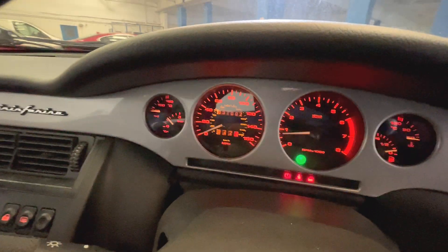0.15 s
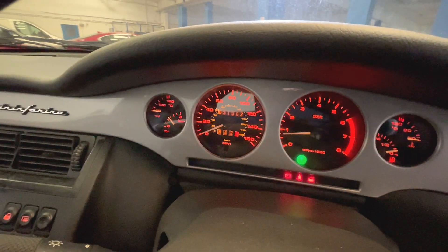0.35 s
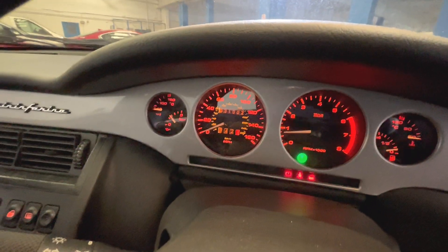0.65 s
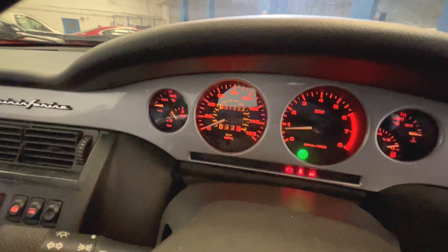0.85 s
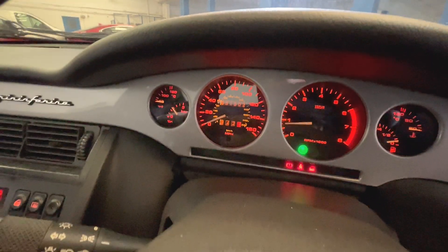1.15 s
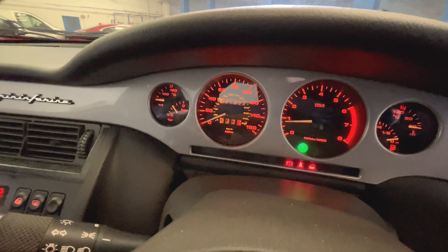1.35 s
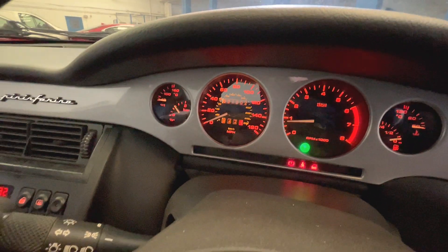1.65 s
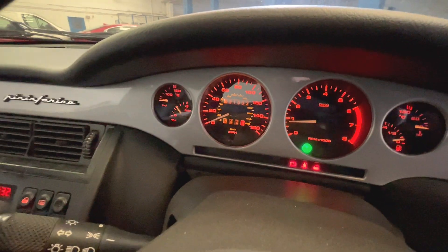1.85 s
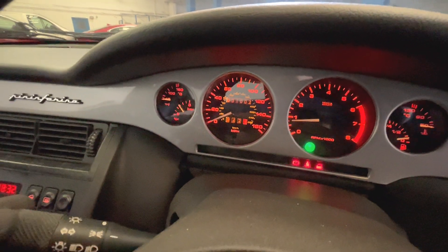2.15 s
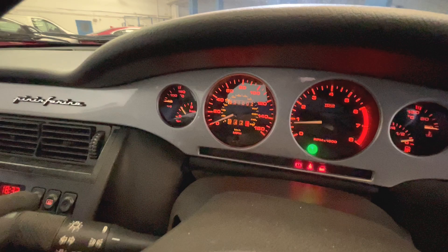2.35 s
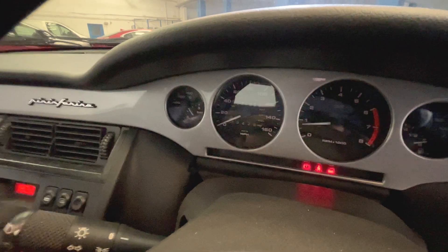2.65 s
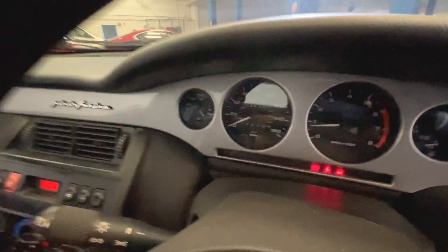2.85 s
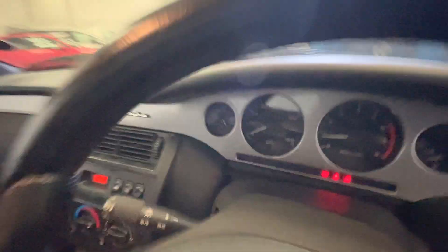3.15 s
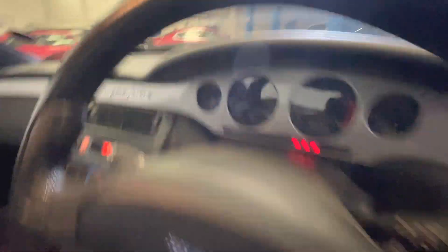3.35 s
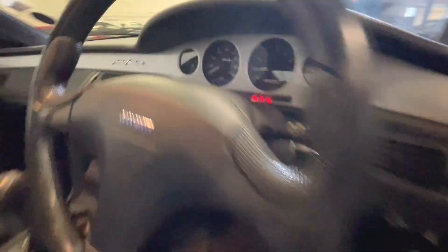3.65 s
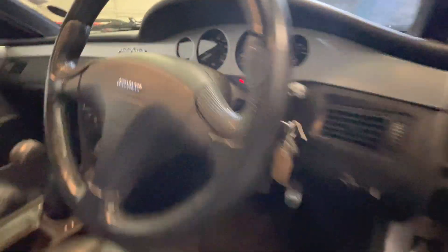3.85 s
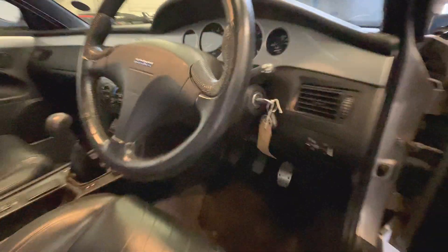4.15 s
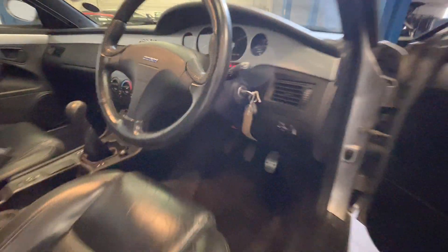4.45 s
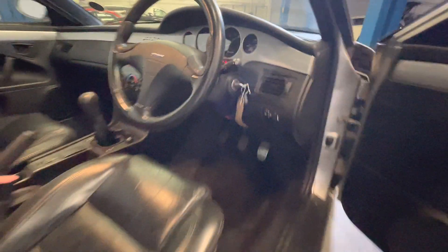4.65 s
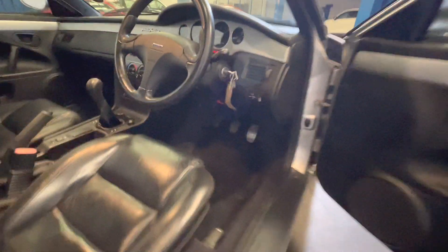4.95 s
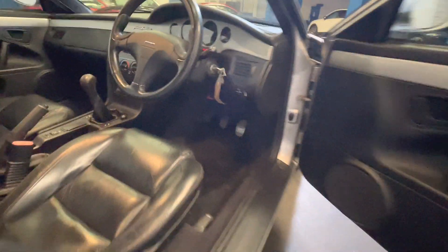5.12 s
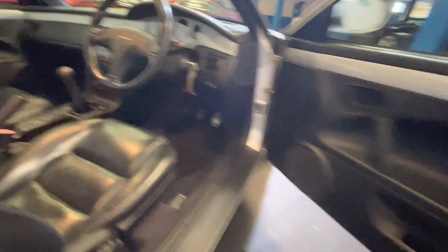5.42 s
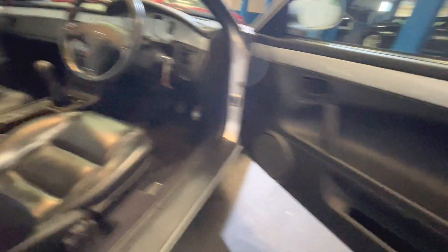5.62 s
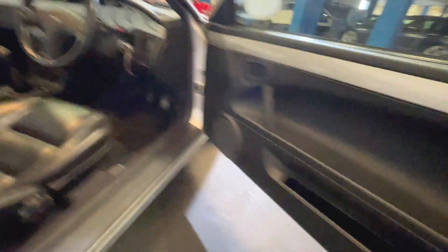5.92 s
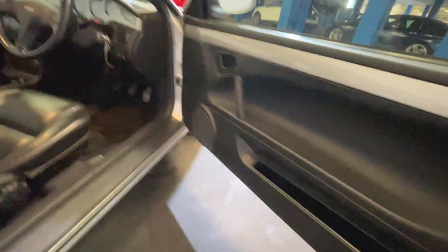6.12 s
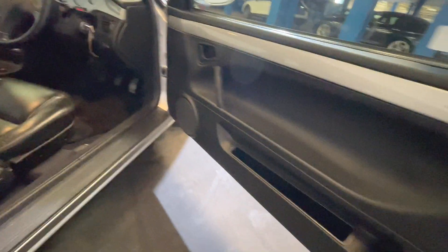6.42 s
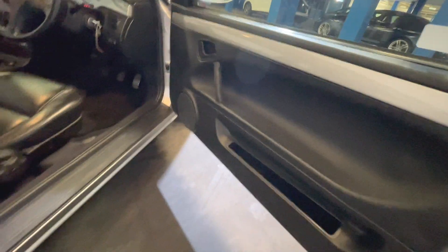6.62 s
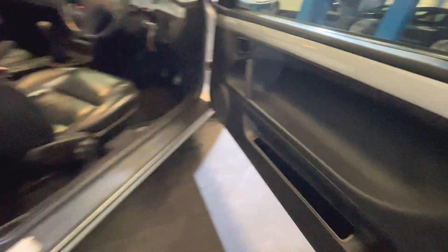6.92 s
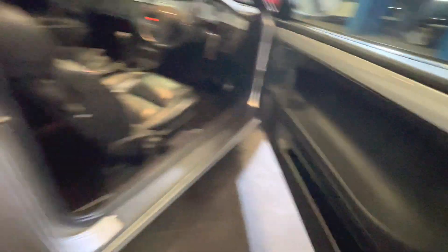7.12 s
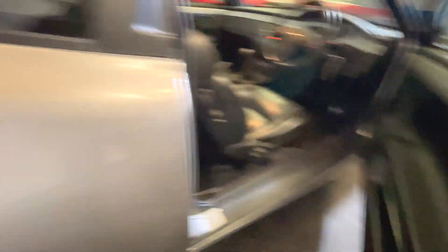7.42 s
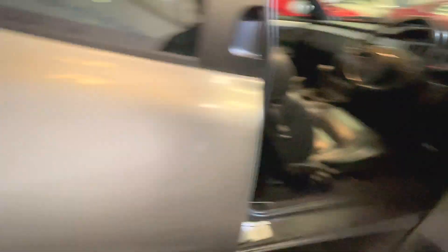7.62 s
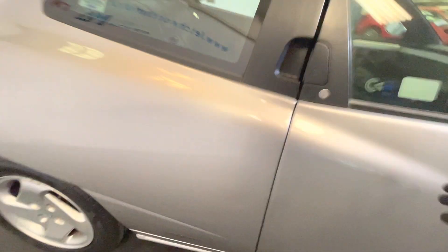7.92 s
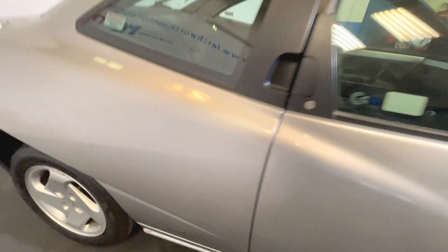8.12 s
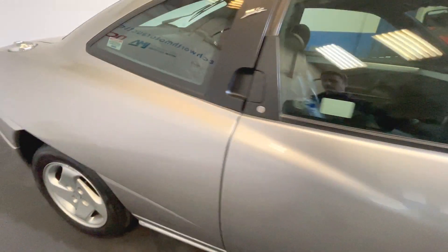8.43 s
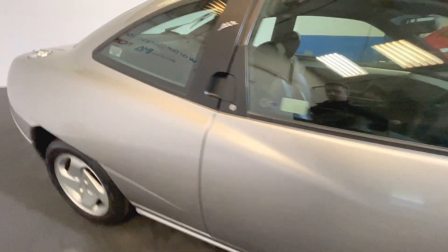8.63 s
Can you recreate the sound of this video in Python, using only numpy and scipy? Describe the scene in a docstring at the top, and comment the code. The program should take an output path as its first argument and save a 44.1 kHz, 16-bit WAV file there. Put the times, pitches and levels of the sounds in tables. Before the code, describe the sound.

A handheld stereo microphone moves from a muffled car cabin to beside the car in a reverberant workshop. The idling exhaust drones low and hunts gently up and down. One sharp switch click and a few tiny trim knocks precede soft fabric brushes. Outside, ticking clatter and airy hiss brighten, mostly to the left. A loud steel-and-panel door slam rings through the hall, and the engine hums on.

```python
"""A car idles in a workshop, its speed hunting slowly up and down, heard first from the driver's seat.
The exhaust is a set of harmonics, the engine bay shaped noise and resonances that follow the firing rate.
The light switch clicks off; the listener climbs out with a rustle of clothes, and the clatter grows.
The door is slammed as rushing air, flexing panel and ringing steel; a diffuse tail of noise makes the hall
answer, and the exhaust hums on."""
import sys
import numpy as np
from scipy import signal
from scipy.fft import rfft, irfft, next_fast_len
from scipy.io import wavfile
from scipy.ndimage import uniform_filter1d

SR = 44100
rng = np.random.default_rng(int(sys.argv[2]) if len(sys.argv) > 2 else 0)


def unload_wav(signal):
    """Save mono or channel-first audio to the path in sys.argv[1] as 16-bit WAV at rate SR, clipped to [-1, 1]."""
    wavfile.write(
        sys.argv[1],
        SR,
        np.round(np.clip(np.atleast_2d(signal).T, -1, 1) * 32767).astype(np.int16),
    )


N = 387198
T = np.arange(N) / SR
MEAN_FIRING_HZ = 23
SIDES = np.array([[1], [-1]])  # left, right

# balance of the two microphones: frequency_hz, left_minus_right_db
STEREO_BALANCE = [(60, -6), (130, -3.5), (400, 0), (700, -3), (1300, -2.5), (2400, 0.5), (4400, 6.5),
                  (8000, 7.5), (15000, -3.5)]
# the same beside the car, where the engine bay lies to the left: frequency_hz, left_minus_right_db
OUTSIDE_BALANCE = [(200, -1), (400, 3), (700, 3), (1290, 6.5), (2400, 2.5), (4400, 3.5), (8000, 2),
                   (15000, -1)]
# spectrum of the intake hiss: frequency_hz, density_db (per Hz)
HISS_SPECTRUM = [(2400, -12), (3200, -0.5), (4200, -0.7), (5200, -1), (5480, -7), (5800, -7), (6100, 1.5),
                 (6900, 1), (7400, -5), (8300, -1.5), (9700, -8.5), (11000, -8.5), (12600, -5.5),
                 (14200, -11), (16000, -20)]


def gain_of(db):
    """Decibels express an amplitude ratio: 20 dB for each factor of ten."""
    return 10 ** (np.asarray(db) / 20)


def evened(x):
    """Normalization: scales to an rms of 1."""
    return x / np.sqrt(np.mean(x ** 2) + 1e-20)


def decay(t, t60):
    """Exponential damping: the amplitude falls by 60 dB in t60 seconds."""
    return np.exp(-np.log(1000) * t / t60)


def read(points, hz):
    """Interpolates a spectrum table on a log-frequency axis."""
    f, value = np.transpose(points)
    return np.interp(np.log(hz + 1), np.log(f + 1), value)


def curve(points):
    """Interpolates a time table linearly at every sample."""
    s, value = np.transpose(points)
    return np.interp(T, s, value)


def add(mix, s, sound):
    """Superposition: adds a sound at its start time, cut at the end of the mix."""
    part = mix[:, round(s * SR):][:, :sound.shape[-1]]
    part += sound[..., :part.shape[1]]


def drift(hz):
    """Low-passed random fluctuation of rms about 1, reaching up to roughly the given rate."""
    size = next_fast_len(N // 16 + 2)
    s = np.arange(size) * 16 / SR  # one value per 16 samples
    lowpass = 1 / (1 + (np.fft.rfftfreq(size, s[1]) / hz) ** 4)
    slow = irfft(rfft(rng.standard_normal(size)) * lowpass, size)
    return evened(np.interp(T, s, slow))


def noise(spectrum, size=N, balance=STEREO_BALANCE):
    """Partial coherence: coloured noise whose likeness and phase at two microphones vary with frequency."""
    # likeness of the two microphones: frequency_hz, coherence (-1 to 1)
    coherence = [(60, 0.7), (130, 1), (290, 0.53), (640, 0.14), (1200, 0.32), (1700, 0.42), (2400, 0.28),
                 (4500, -0.6), (6500, 0.41), (8500, 0.12), (12500, 1)]
    # how far the left microphone leads: frequency_hz, phase_rad
    left_lead = [(200, 0), (400, -.5), (700, -2.25), (1700, -2.5), (4500, 3), (6500, -2), (8500, -4),
                 (12000, -5)]
    padded = next_fast_len(size)
    hz = np.fft.rfftfreq(padded, 1 / SR)
    shared, separate = rfft(rng.standard_normal((2, padded)))
    same = np.clip(read(coherence, hz), -1, 1)
    lean = gain_of(read(balance, hz) / 2)
    left = shared * lean
    delayed = shared * np.exp(-1j * read(left_lead, hz))
    right = (same * delayed + np.sqrt(1 - same ** 2) * separate) / lean
    pair = np.array([left, right]) * gain_of(read(spectrum, hz))
    return evened(irfft(pair, padded)[:, :size])


def burst(spectrum, t60, rise=0.00019, balance=STEREO_BALANCE):
    """High modal density: a blow on a part with many close modes is noise that dies exponentially."""
    t = T[:SR // 4]
    return noise(spectrum, size=len(t), balance=balance) * (1 - np.exp(-t / rise)) * decay(t, t60)


def struck(modes, apart=0.14):
    """Modal synthesis: dying sines of random phase, a little apart (in cycles) at the two microphones."""
    t = T[:SR // 3]
    ring = 0
    for hz, db, t60 in modes:
        phase = rng.random() + apart * rng.standard_normal((2, 1))
        ring = ring + gain_of(db) * decay(t, t60) * np.sin(2 * np.pi * (hz * t + phase))
    return ring


def openness_outside():
    """Transmission path: how open the ear is to the engine bay, 0 in the seat to 1 outside."""
    # the way out of the car: time_s, openness (0-1)
    way_out = [(0, 0), (2.7, 0.07), (3.4, 0.12), (4.3, 0.57), (5.3, 0.98), (7.2, 0.94), (8.78, 0.93)]
    return np.clip(curve(way_out), 0, 1)


def level(law, firing_hz):
    """Source strength grows with engine speed; the level also changes on the way out of the car."""
    seat_db, db_per_hz, outside_db = law
    speed_db = db_per_hz * (firing_hz - MEAN_FIRING_HZ)
    return gain_of(seat_db + speed_db + outside_db * openness_outside())


def hum(hum_hz=123, hum_db=-53, waver_db=1.0):
    """A steady oscillation: a faint hum that holds its pitch while the engine hunts."""
    return gain_of(hum_db + waver_db * drift(4)) * np.sqrt(2) * np.cos(2 * np.pi * hum_hz * T)


def hall(x, build=0.0072):
    """Diffuse reverberation: scattered energy swells as the far walls answer and dies band by band."""
    # the workshop's decay: frequency_hz, t60_s
    room_t60 = [(60, 1.8), (250, 1.23), (1500, 3), (5000, 1.47), (9000, 1.1), (15000, 1.6)]
    # spectrum of the tail: frequency_hz, density_db (per Hz)
    room_colour = [(25, -5), (70, 11.5), (170, 23), (260, 18.5), (340, 10.5), (600, 1), (1100, -0.5),
                   (1800, -0.5), (2600, -3.5), (5000, -8), (9000, -16), (15000, -46)]
    # answers of the far walls: delay_s, spread_s, swell_db
    wall_answers = [(0.19, 0.04, 7), (0.29, 0.075, 7.5)]
    scattered = np.sqrt((x ** 2).mean(0)) * rng.standard_normal((2, N))
    hz, t, z = signal.stft(noise(room_colour, size=SR), SR, nperseg=512)
    answers_db = sum(db * np.exp(-((t - delay) / spread) ** 2) for delay, spread, db in wall_answers)
    swell = (1 - np.exp(-t / build)) * gain_of(answers_db)
    z = z * decay(t, read(room_t60, hz)[:, None]) * swell
    tail = signal.istft(z, SR, nperseg=512)[1]
    return signal.fftconvolve(scattered, tail / np.linalg.norm(tail[0]), axes=1)[:, :N]


def clothes():
    """Stick-slip friction: short strokes of fabric on the seat, made of tiny snags that come in clumps."""
    # strokes: centre_s, length_s, level_db, centre_hz, width_octaves
    brushes = [(2.98, 0.6, -61, 12490, 0.57), (3.145, 0.11, -55, 10500, 0.41),
               (5.027, 0.14, -52, 8500, 0.92), (5.051, 0.08, -42.5, 7180, 1.1),
               (5.392, 0.2, -51, 12600, 0.18), (6.304, 0.2, -55, 11120, 0.42),
               (6.528, 0.2, -50.5, 11890, 0.6)]
    out = np.zeros((2, N))
    hz = np.geomspace(100, SR / 2, 80)
    for s, length, db, centre_hz, octaves in brushes:
        off_band = np.log2(hz / centre_hz) / octaves
        # the band borrows the hiss spectrum above its lowest point
        band = np.transpose([hz, read(HISS_SPECTRUM[1:], hz) - 10 * np.log10(1 + off_band ** 6)])
        stroke = np.hanning(round(length * SR))
        add(out, s - length / 2, gain_of(db) * stroke * noise(band, size=len(stroke)))
    snags = evened(gain_of(2.5 * drift(700) + 1.2 * drift(70)))
    return out * snags


def clicks(ping_t60=0.0084):
    """Impact excitation: hard plastic snaps, each with a ping, a ring and a knock of the hollow trim."""
    # light switch and small knocks of trim; hollow and ring are relative to the snap:
    # start_s, snap_db, snap_t60_s, hollow_db, ring_db, ping_hz, ping_db
    contacts = [(0.905, -44, 0.011, -25, -22, 3760, -40), (2.4245, -26, 0.012, -24, -8.5, 6350, -25),
                (2.4276, -35.5, .06, -18, -5, 2400, -38), (2.4414, -39, .025, -10, -6, 8700, -42),
                (2.4445, -39.5, .045, -10, -5, 6500, -39), (2.643, -52, .012, -25, -20, 13000, -48),
                (3.132, -42, 0.009, -22, -16, 9300, -40), (4.237, -45, .012, -15, -14, 12500, -48),
                (4.396, -48, 0.015, 7, -20, 620, -35)]
    # spectra of the snap and of the hollow knock: frequency_hz, density_db (per Hz)
    plastic = [(300, -19), (1500, -16), (2400, -3), (3300, -4), (5000, -8.5), (6300, -3), (8000, -7),
               (10000, -7), (13000, -5), (16000, -28)]
    hollow = [(200, -21), (600, 4), (1000, -3), (1700, 6), (3000, -20), (8000, -35)]
    # ring of the switch and its plastic surround: frequency_hz, relative_db, t60_s
    switch_modes = [(990, -7, 0.08), (2350, -6, 0.03), (3730, -14, .03), (5356, -12, .05), (6056, -6, .05),
                    (6680, -4, .05), (8650, -9, 0.05), (9500, -10, .03), (11720, -9, .04), (13300, 0, .016)]
    out = np.zeros((2, N))
    for s, db, t60, hollow_db, ring_db, ping_hz, ping_db in contacts:
        snap = burst(plastic, t60)
        knock = gain_of(hollow_db) * burst(hollow, 0.15)
        add(out, s, gain_of(db) * (snap + knock))
        ring = gain_of(db + ring_db) * struck(switch_modes)
        add(out, s, ring + struck([(ping_hz, ping_db, ping_t60)]))
    return out


def door(push=0.0032, panel_db=-21, trim_db=-20, trim_t60=0.19):
    """Dispersive bending waves: thumps flex the skin, high waves first, after air rushes from the gap."""
    # air squeezed from the closing gap: start_s, length_s, level_db
    air_rush = (7.83, 0.09, -32.5)
    # spectra of the air and of loose trim and glass: frequency_hz, density_db (per Hz)
    air = [(100, -2), (400, 6), (900, 1), (2000, -11), (8000, -30)]
    trim = [(60, -17), (130, 4), (220, 0), (330, 0), (520, -8), (800, -13), (2000, -55)]
    # door skin and cabin air: frequency_hz, relative_db, t60_s
    panel_modes = [(35.9, -5, 1.6), (110.5, 2, 0.1), (161, 2.5, 0.11), (213, 3, 0.12), (256, 6, 0.11),
                   (307, 7, 0.13), (335, -0.5, 0.11)]
    # the door meets its seal, then slams home: start_s, level_db, glide_s, t60_s
    thumps = [(7.9379, -0.5, 0.0034, 0.086), (7.9568, -0.5, 0.005, 0.1)]
    flex_high_hz, flex_low_hz = 284, 66
    out, t = np.zeros((2, N)), T[:SR]
    s, length, db = air_rush
    swell = np.linspace(0, 1, round(length * SR))
    add(out, s, gain_of(db) * swell * noise(air, size=len(swell)))
    panel = sum(gain_of(db) * decay(t, t60) * np.sin(2 * np.pi * hz * t) for hz, db, t60 in panel_modes)
    for s, db, glide, t60 in thumps:
        hz = flex_low_hz + (flex_high_hz - flex_low_hz) * np.exp(-t / glide)
        flex = np.sin(2 * np.pi * np.cumsum(hz) / SR) * decay(t, t60)
        add(out, s, gain_of(db) * (1 - np.exp(-t / push)) * (flex + gain_of(panel_db) * panel))
        add(out, s, gain_of(db + trim_db) * burst(trim, trim_t60, rise=0.0048))
    return out


def latch(rattle_db=-6, rattle_t60=0.11, rise=0.0003, lean_db=1.0):
    """Selective modal excitation: each contact snaps and rings its part of the steel, with a little rattle."""
    # the latch strikes, catches and seats:
    # start_s, ring_db, ring_time_share, snap_db, snap_t60_s, ring_pitch_hz
    contacts = [(7.9163, -9.5, 0.76, -14, 0.03, 2300), (7.9178, -14, 0.8, -30, 0.03, 1250),
                (7.9212, -11.5, 1.1, -18, 0.053, 1520), (7.9305, -16.5, 0.7, -20, 0.03, 517),
                (7.9346, -19, 0.46, -10.5, 0.023, 1250), (7.9372, -17, 0.6, -9, 0.032, 1030),
                (7.9523, -24, 0.4, -8.5, 0.024, 2340), (7.9543, -12, 0.52, -17, 0.04, 2040),
                (7.9575, -16.5, 1.05, -27.5, 0.19, 1560), (7.968, -23, 0.8, -24, 0.04, 1900),
                (8.008, -36, 0.6, -30, 0.03, 2000)]
    # latch and striker steel: frequency_hz, relative_db, t60_s (before the share)
    steel = [(497, 0, 0.15), (660, 3, 0.11), (798, -0.5, 0.14), (1034, -2.5, 0.078), (1224, 0, 0.08),
             (1339, 3.5, 0.08), (1568, 4, 0.039), (2016, 0, 0.066), (2250, -0.5, 0.07), (2335, -3.5, 0.055),
             (2600, -9, 0.023), (3170, -6, 0.054), (3920, -5, 0.061)]
    # spectra of the rattle and of the snap: frequency_hz, density_db (per Hz)
    rattle_spectrum = [(150, -6), (450, -3), (780, -1), (1100, 6), (1340, 2), (1460, -12), (1650, 6),
                       (1950, -12), (2280, 6), (2500, -7), (3000, -11), (4100, -15), (7000, -33),
                       (16000, -26)]
    snap_spectrum = [(300, 7.5), (2000, 7), (2700, 4.5), (3200, 3), (4000, -1.5), (5600, -3.5), (6500, 2),
                     (7600, -7), (9000, -2), (12000, -3.5), (16000, -14)]
    # where the snap is heard: frequency_hz, left_minus_right_db
    snap_balance = [(500, 1), (3500, 2), (8000, -3), (14000, 0)]
    focus_db, focus_octaves = 13.5, 0.25  # a contact favours the steel modes near its own pitch
    out = np.zeros((2, N))
    for s, ring_db, ring_share, snap_db, snap_t60, pitch_hz in contacts:
        modes = []
        for hz, db, t60 in steel:
            nearness = np.exp(-(np.log2(hz / pitch_hz) / focus_octaves) ** 2)
            modes.append((hz, db - focus_db * (1 - nearness), t60 * ring_share))
        ring = struck(modes)
        add(out, s, gain_of(ring_db) * ring * (1 - np.exp(-T[:ring.shape[1]] / rise)))
        rattle = gain_of(ring_db + rattle_db) * burst(rattle_spectrum, rattle_t60 * ring_share)
        snap = gain_of(snap_db) * burst(snap_spectrum, snap_t60, balance=snap_balance)
        add(out, s, rattle + snap)
    return out * gain_of(SIDES * lean_db)


def whine(whine_hz=1476, waver_hz=2.02, fading_db=3.0):
    """Interference: reflections make a thin line from the engine bay fade differently at each microphone."""
    # time_s, level_db
    whine_level = [(0, -62), (.7, -64), (.9, -56.5), (1.8, -56), (2.3, -65), (2.7, -55), (3.05, -68),
                   (3.45, -52.5), (4.1, -58.5), (4.7, -54), (5.15, -54), (5.55, -47), (6, -43),
                   (6.4, -53.5), (6.85, -49), (7.5, -56), (8.78, -55)]
    turns = np.cumsum(whine_hz + waver_hz * drift(5.1)) / SR
    level_db = curve(whine_level)
    channels = []
    for lag in (0, 1):  # radians
        fading = gain_of(level_db + fading_db * drift(12.0))
        channels.append(fading * np.sqrt(2) * np.cos(2 * np.pi * turns + lag))
    return np.array(channels)


def intake(dull_db=-3, dull_above_hz=9000, flutter_db=0.6):
    """Turbulent flow noise: a fluttering hiss, duller above 9 kHz in the seat."""
    # time_s, level_db
    hiss_level = [(0, -58), (2.2, -57), (3.8, -54), (4.8, -55), (5.3, -50), (6.3, -47.5), (7.2, -50.5),
                  (8.78, -50.5)]
    openness = openness_outside()
    dulled = [(hz, db + dull_db * (hz > dull_above_hz)) for hz, db in HISS_SPECTRUM]
    inside = np.sqrt(1 - openness) * noise(dulled)
    outside = np.sqrt(openness) * noise(HISS_SPECTRUM, balance=OUTSIDE_BALANCE)
    return gain_of(curve(hiss_level) + flutter_db * drift(39)) * (inside + outside)


def belt(firing_hz, waver_hz=14, flare_db=2.0, lag=1.82):
    """Narrow-band modulation: a ragged sizzle, probably the belt, in bands that rise with engine speed."""
    # the sizzle at mean speed: centre_hz, width_hz, relative_db
    bands = [(1673, 41, 0.5), (1762, 41, 0.5)]
    # time_s, level_db
    belt_level = [(0, -56.5), (2.7, -57), (3.3, -52), (3.95, -47.5), (4.5, -52.5), (5.25, -44), (5.7, -44),
                  (6.3, -50.5), (6.9, -49), (7.5, -54), (8.78, -51)]
    rise_hz = 20 * (firing_hz - MEAN_FIRING_HZ)  # 20 Hz per Hz of firing rate
    out = np.zeros((2, N))
    for hz, width, db in bands:
        turns = np.cumsum(hz + rise_hz + waver_hz * drift(7)) / SR
        band = (drift(width / 2) + 1j * drift(width / 2)) * np.exp(2j * np.pi * turns)
        pair = np.array([band, band * np.exp(1j * lag)]).real
        out += gain_of(db + flare_db * drift(5.7)) * pair
    return gain_of(curve(belt_level)) * out


def valve_gear(turns, firing_hz, fading=0.49, jitter=.006):
    """Order resonance: overtones swell at each resonance; phase jitter (in turns) roughens the high ones most."""
    # orders of the valve gear: firing_multiple, peak_db (relative), resonance_hz, width_hz
    gear_orders = [(16, 0, 398, 37), (17, -2, 388, 26), (19, -2, 470, 20), (32, -0.5, 762, 37)]
    # level of the overtones: time_s, level_db
    gear_level = [(0, -59.5), (2.7, -63.5), (3.1, -58.5), (4.2, -51.5), (5.35, -54.5), (6.3, -56),
                  (8.78, -57)]
    orders = 0
    for k, db, hz, width in gear_orders:
        fade = 1 + fading * drift(13)
        uneven_turns = turns + jitter * drift(25.0)
        tone = np.sqrt(2) * np.cos(2 * np.pi * k * (uneven_turns + rng.random((2, 1))))
        detuning = 2 * (k * firing_hz - hz) / width
        orders = orders + gain_of(db) * fade * tone / np.hypot(1, detuning)
    return gain_of(curve(gear_level)) * orders


def singing_parts(flare_db=2.0):
    """Forced resonance: narrow modes driven by noise, each flaring and fading by itself."""
    # engine parts that sing when shaken: centre_hz, half_width_hz (at -6 dB), relative_db
    bay_modes = [(382, 46, -21.5), (487, 20, -26.5), (612.5, 4.6, -25.5), (689, 20, -22.5),
                 (771, 24, -21.5), (903, 39, -21), (1367, 17, -13.5), (1631, 37, -9), (1866, 45, -15),
                 (2420, 210, -11), (2960, 5.1, -22)]
    # lower resonances come up through the footwell: time_s, boost_db
    footwell = [(0, 2), (2.6, 2), (3, 11), (4.4, 5), (8.78, 7.5)]
    padded = next_fast_len(N)
    hz, out = np.fft.rfftfreq(padded, 1 / SR), np.zeros((2, N))
    shaking = rfft(rng.standard_normal((2, padded)))
    footwell_db = curve(footwell)
    for centre, width, db in bay_modes:
        ring = irfft(shaking / (1 + ((hz - centre) / width) ** 2), padded)[:, :N]
        is_low = centre < 1000
        out += gain_of(db + is_low * footwell_db) * evened(ring * gain_of(flare_db * drift(4.2)))
    return out


def engine_bay(turns, firing_hz, clatter_db=1.0, throb=0.045, flutter_db=1.17, lean_db=0.9):
    """Amplitude modulation: rumble and valve clatter throb with the firing; the cabin muffles the clatter."""
    # frequency_hz, density_db (per Hz)
    rumble = [(18, -21), (30, -26), (48, -35), (80, 7.5), (115, 1.5), (165, -1.5), (205, 3), (245, -2),
              (290, -6.5), (400, -8), (560, -17), (900, -66.5)]
    clatter_inside = [(260, -4), (450, -2), (560, -3.5), (850, 2.5), (1120, -0.5), (1330, 1.5), (1850, 4),
                      (2050, -4.5), (2400, -6.5), (2820, -4), (3100, -12), (3500, -14), (4500, -63)]
    clatter_outside = [(260, -6), (450, -13.5), (540, -4), (850, -1.5), (1100, 2), (1350, 2.5), (1850, 6),
                       (2050, -0.5), (2450, -2), (2820, -3.5), (3200, -10.5), (3500, -19), (4500, -45)]
    # seat_db (at mean speed), speed_db_per_hz (of firing rate), outside_gain_db
    rumble_law = (-42.5, 0.97, -1.55)
    clatter_law = (-48.5, 0.36, 8.8)
    openness = openness_outside()
    beat = 1 + throb * (np.cos(2 * np.pi * 2 * turns) + np.cos(2 * np.pi * turns))
    inside = np.sqrt(1 - openness) * noise(clatter_inside)
    outside = np.sqrt(openness) * noise(clatter_outside, balance=OUTSIDE_BALANCE)
    low = level(rumble_law, firing_hz) * noise(rumble)
    valves = gain_of(clatter_db + flutter_db * drift(25)) * (inside + outside)
    singing = gain_of(SIDES * lean_db) * singing_parts()
    return (low + level(clatter_law, firing_hz) * (valves + singing)) * beat


def firing_rate(sag_linger=1.25):
    """Slow frequency modulation: half-cosine glides between turning points; sags start late."""
    # the idle hunts between troughs and crests: time_s, firing_hz
    hunt = [(0.201, 20.82), (1.17, 24.62), (2.498, 21.68), (3.33, 24.83), (4.75, 21.12), (5.7, 24.67),
            (7.08, 21.01), (8.08, 25.16), (9.3, 21.33)]
    s, hz = np.transpose(hunt)
    place = np.interp(T, s, np.arange(len(s)))
    leg = np.minimum(place.astype(int), len(s) - 2)
    step = np.diff(hz)[leg]
    # an exponent above 1 makes the speed hang near a crest before it sags
    progress = (place - leg) ** np.where(step < 0, sag_linger, 1)
    return hz[leg] + step * (1 - np.cos(np.pi * progress)) / 2


def exhaust(turns, firing_hz, half_db=-21, uneven=0.3, cabin_lag=0.52, cabin_lean_db=0.36):
    """Resonant harmonics: multiples of the firing rate boom in turn as they glide through the car's resonances."""
    # weaker harmonics: firing_multiple, seat_db, outside_db
    weak_harmonics = [(1, -55, -56), (5, -50, -47), (6, -61.5, -48.5), (7, -52.5, -51), (8, -63.5, -67),
                      (9, -58.5, -59.5)]
    # boom of a harmonic at each pitch, in the seat and beside the car: pitch_hz, level_db
    boom_inside = [(42, -36), (46, -43), (49.5, -50), (63, -30), (68, -25.5), (74, -24), (84, -27),
                   (87.5, -32), (93, -37), (99, -57)]
    boom_outside = [(42, -42), (49.5, -40.5), (63, -38), (66, -32), (69.5, -32.5), (72, -23), (74.5, -20.5),
                    (84, -24.5), (88, -26), (92, -36), (99, -50)]
    # level changes of the boom: rises, fades and a short dip just after the slam: time_s, change_db
    boom_changes = [(0, -6.5), (1.1, 0.5), (1.8, -3), (2.9, -1.5), (3.62, 0), (3.73, -10), (4.5, -5.5),
                    (4.9, -3.5), (5.9, 1.5), (6.45, -3), (7.4, 1), (7.53, -5), (7.7, 2.5), (7.93, 2),
                    (8.03, -7.5), (8.11, 1.5), (8.22, -3.5), (8.48, 3), (8.56, -5), (8.61, -19),
                    (8.69, -6.5), (8.78, 0.5)]
    shake, shake_hz = .09, 13  # uneven combustion
    inside = 1 - openness_outside()
    change_db = curve(boom_changes)

    def tone(k):
        """Phase difference: a harmonic of rms 1, lagging (rad) at the left microphone inside the cabin."""
        return np.sqrt(2) * np.cos(2 * np.pi * (k * turns + rng.random()) - SIDES * cabin_lag * inside / 2)

    def boom_tone(k, extra_db=0):
        """Resonance: a harmonic weighted by the car's response at its present pitch."""
        seat_db, outside_db = read(boom_inside, k * firing_hz), read(boom_outside, k * firing_hz)
        return gain_of(inside * seat_db + (1 - inside) * outside_db + change_db + extra_db) * tone(k)

    boom = sum(boom_tone(k) for k in (2, 3, 4))
    # unequal cylinders add half orders: a regular lope
    boom = boom + sum(boom_tone(k, half_db) for k in (2.5, 3.5, 4.5))
    rest = 0
    for k, seat_db, outside_db in weak_harmonics:
        gain = gain_of(inside * seat_db + (1 - inside) * outside_db)
        rest = rest + gain * tone(k) * (1 + uneven * drift(shake_hz))
    lean = gain_of(SIDES * (0.56 + cabin_lean_db * inside))
    return (boom * (1 + shake * drift(shake_hz)) + rest) * lean


def scene(hall_db=-14):
    """Superposition: engine, small contacts, and the slam with its answer from the hall."""
    firing_hz = firing_rate()
    turns = np.cumsum(firing_hz) / SR  # firing cycles
    slam = latch() + door()
    engine = exhaust(turns, firing_hz) + engine_bay(turns, firing_hz) + valve_gear(turns, firing_hz)
    engine = engine + belt(firing_hz) + intake() + whine() + hum()
    return engine + clicks() + clothes() + slam + gain_of(hall_db) * hall(slam)


def record(dry, threshold_db=-14, recovery_db_per_s=40, squeeze=0.097):
    """Compression: gain ducks at loud peaks and recovers steadily; then soft overload and the band limit."""
    edge_hz = 15800
    power_db = 10 * np.log10(abs(uniform_filter1d((dry ** 2).mean(0), size=300)) + 1e-12)
    fall = T * recovery_db_per_s
    held_db = np.maximum.accumulate(power_db + fall) - fall
    over_db = np.maximum(held_db - threshold_db, 0)
    ducked = dry / gain_of(squeeze * uniform_filter1d(over_db, size=200))
    lowpass = signal.firwin(511, edge_hz, window=("kaiser", 9), fs=SR)
    return signal.oaconvolve(np.tanh(ducked), lowpass[None], "same")


dry = scene()
out = record(dry)
unload_wav(out)
```